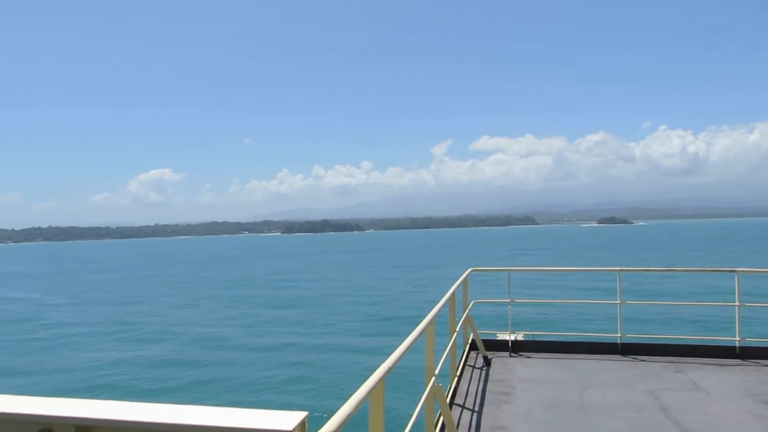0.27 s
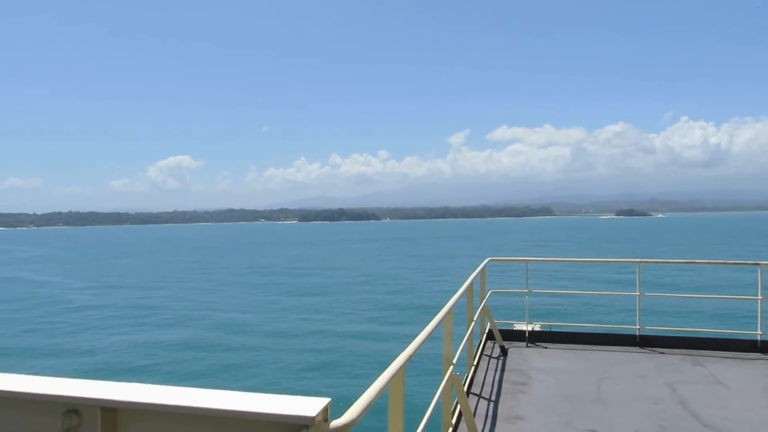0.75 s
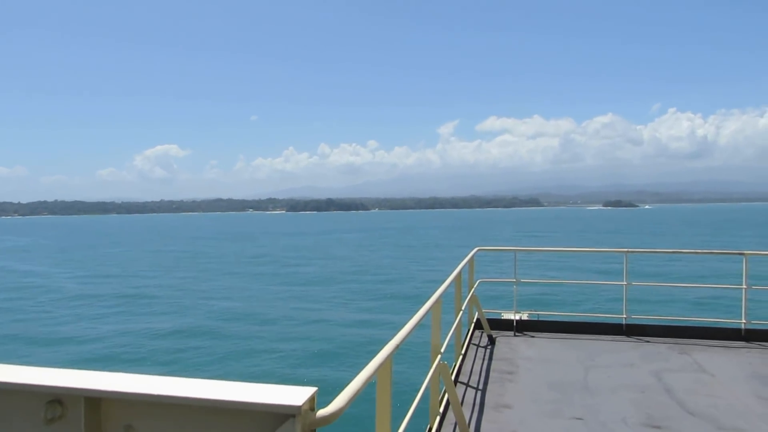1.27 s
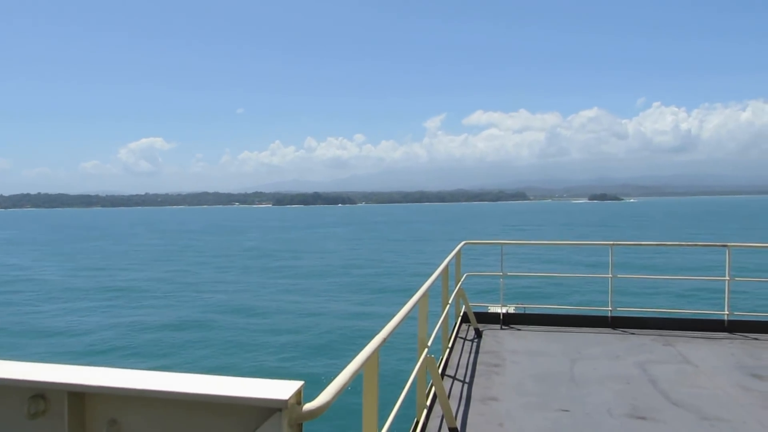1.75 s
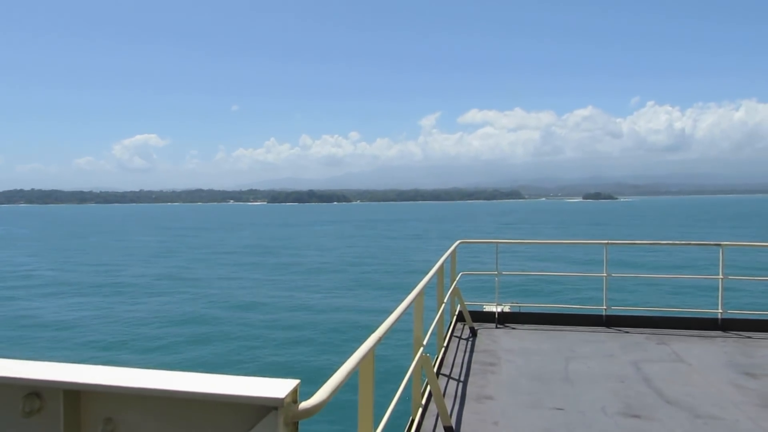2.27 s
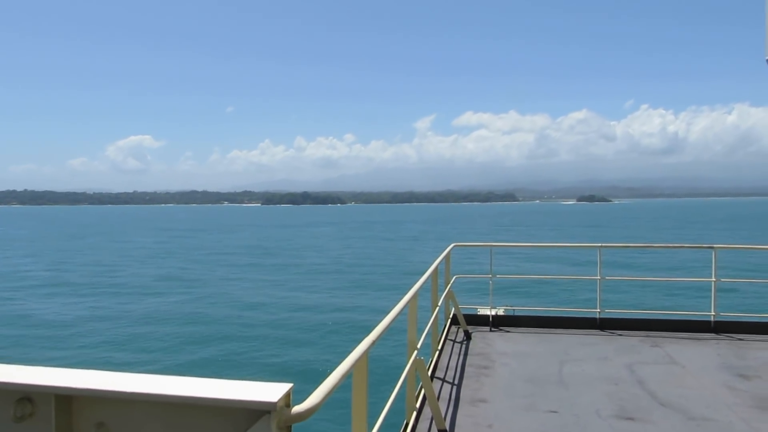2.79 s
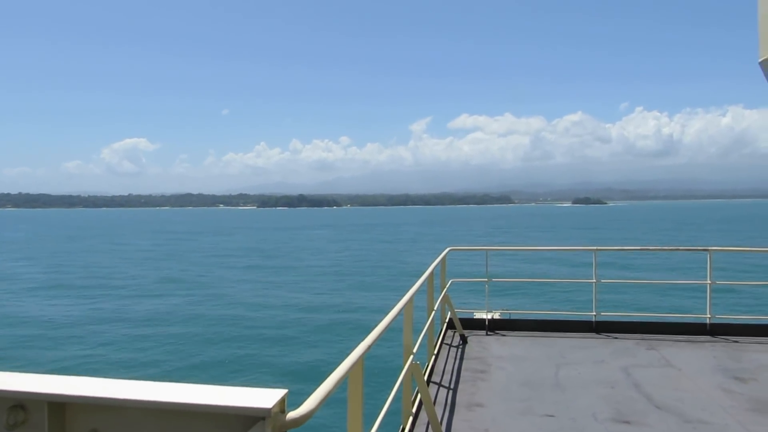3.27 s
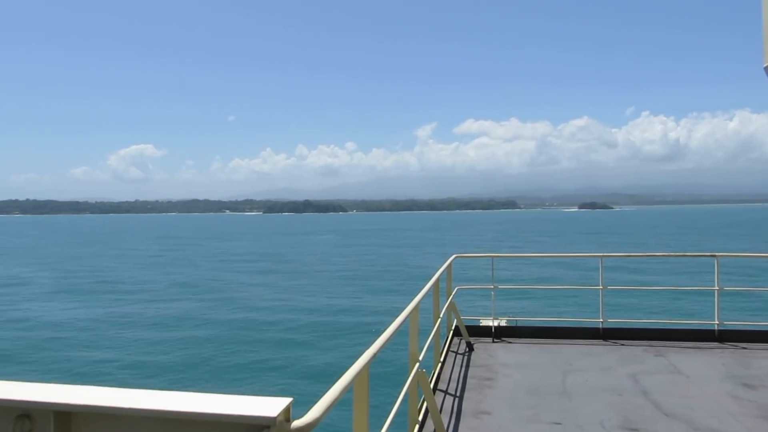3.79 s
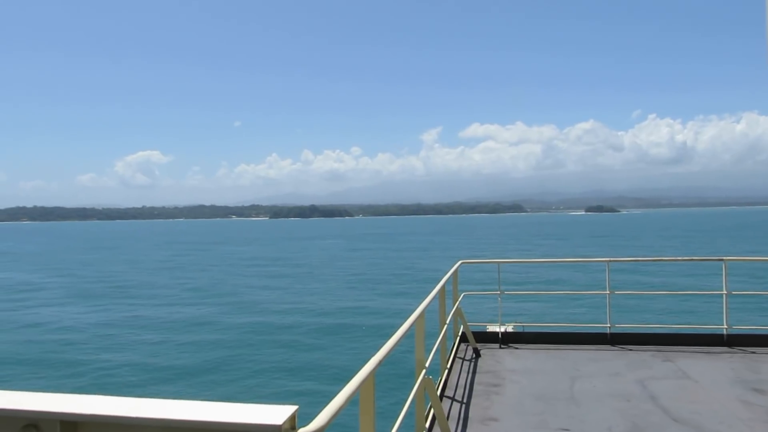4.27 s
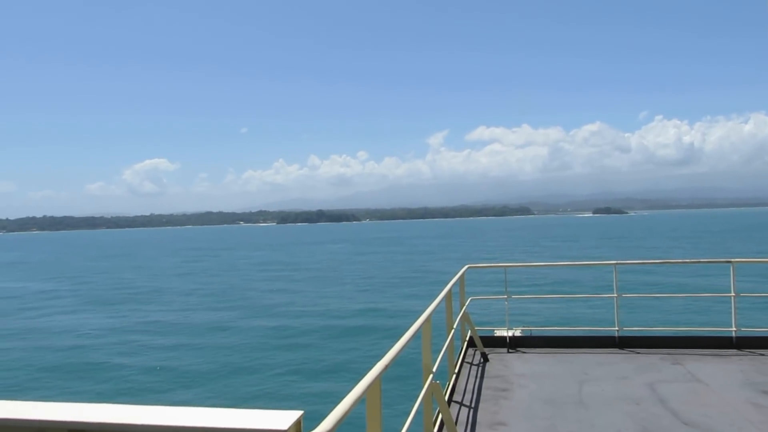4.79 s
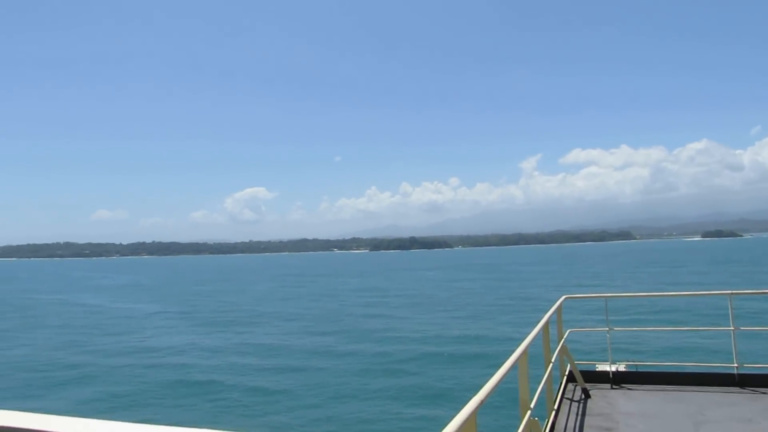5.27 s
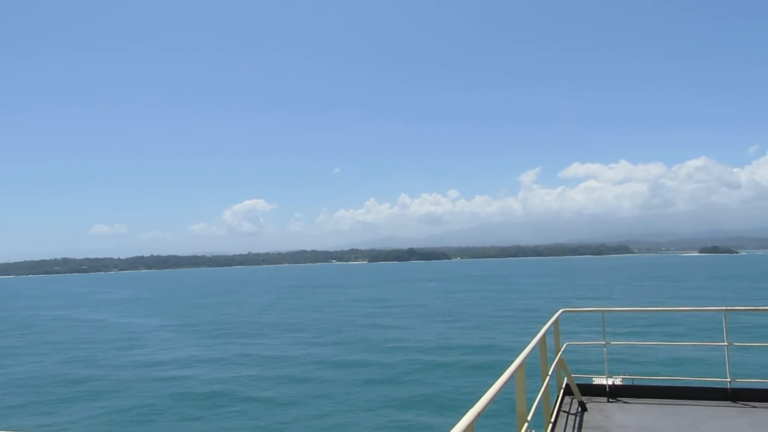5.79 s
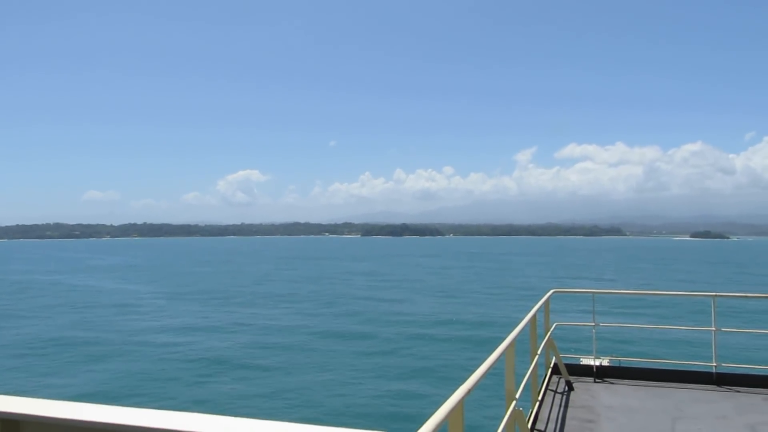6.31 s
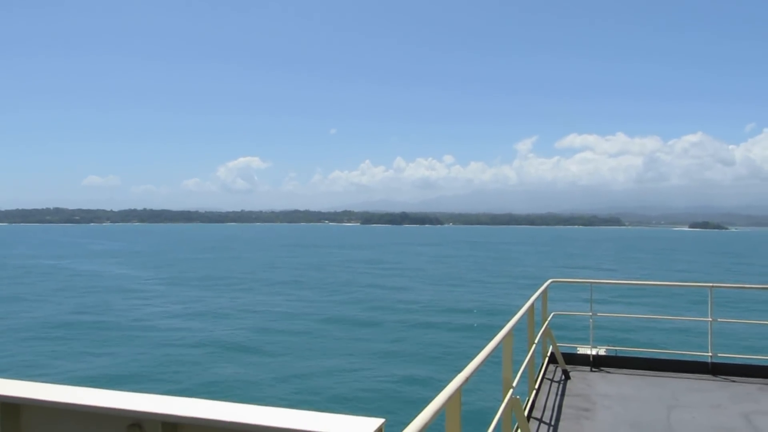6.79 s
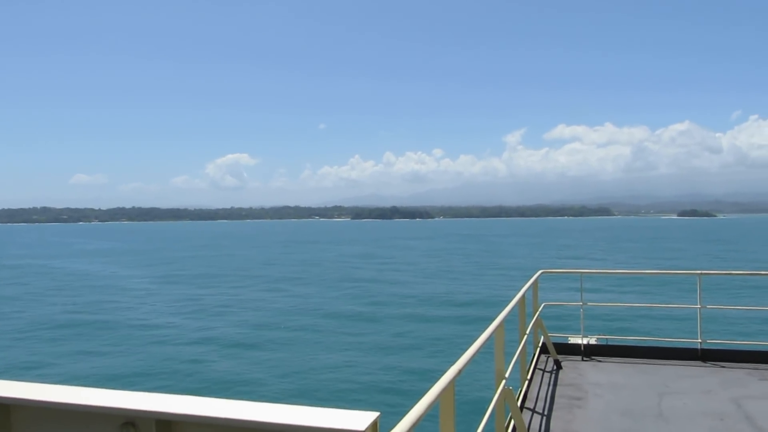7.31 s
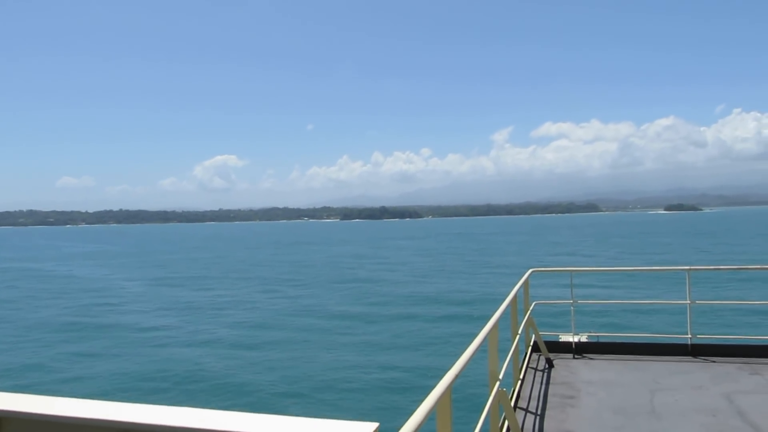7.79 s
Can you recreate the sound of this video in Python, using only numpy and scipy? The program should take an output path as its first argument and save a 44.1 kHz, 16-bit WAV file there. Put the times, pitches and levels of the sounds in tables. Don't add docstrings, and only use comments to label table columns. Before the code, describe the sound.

Deep diesel drone and rolling throb under a broad fan and wash roar, with bursts of low wind buffeting and occasional knocks on the microphone housing.

```python
import sys
import numpy as np
from scipy import signal
from scipy.fft import rfft, irfft, next_fast_len
from scipy.io import wavfile

SR = 44100
rng = np.random.default_rng(int(sys.argv[2]) if len(sys.argv) > 2 else 0)


def invert_db(level):
    return 10 ** (np.asarray(level, dtype=float) / 20)


def wav_out(sig):
    wavfile.write(sys.argv[1], SR, np.round(np.clip(np.atleast_2d(sig).T, -1, 1) * 32767).astype(np.int16))


N = 355005
TIME = np.arange(N) / SR
ENGINE_CYCLE_HZ = 6.006


def rms_one(x):
    return x / np.sqrt(np.mean(x ** 2) + 1e-20)


def in_time(rows):
    return np.interp(TIME, *np.transpose(rows))


def at_hz(points, hz, axis=1):
    points = np.array(points)
    return np.interp(np.log(hz), np.log(points[:, 0]), points[:, axis])


def drift(rate_hz):
    pole = np.exp(-80 * np.pi * rate_hz / SR)
    noise = rng.standard_normal(N // 40 + 2002)
    slow = signal.lfilter([1], [1, -2 * pole, pole * pole], noise)[2000:]
    return np.interp(np.arange(N) / 40, np.arange(len(slow)), rms_one(slow))


def tone(phase, level_db, pan_db, right_lead):
    left = np.cos(phase)
    right = invert_db(-pan_db) * np.cos(phase + right_lead)
    return np.sqrt(2) * invert_db(level_db) * np.array([left, right])


# pitch_hz, density_db (per Hz)
ROAR_SPECTRUM = [(12, -24.5), (30, -7), (70, -3.5), (125, -3.5), (175, -0.5), (225, -5), (270, -11.5),
                 (350, -11.5), (500, -18), (1000, -23.5), (2000, -34.5), (3500, -43), (4400, -50),
                 (7500, -55), (13000, -66), (15500, -86)]
# pitch_hz, width_hz, boost_db
DUCT_RESONANCES = [(172, 20, 2), (484, 45, 4), (720, 50, 4), (1050, 80, 2.5), (1633, 24, 7)]
# pitch_hz, left_right_likeness (-1 to 1), left_minus_right_db
ROAR_IMAGE = [(25, 0.064, 3.5), (70, 1, 6.5), (140, 0.83, 4.5), (307, 1, 8), (600, 0.77, 1),
              (1000, 0.88, 2.2), (2000, 0.67, 1), (3500, 0.52, 1.2), (5000, 0.34, 0.5), (7500, -.06, 0),
              (10000, -.24, 1.5), (14000, 0.037, 0.5)]


def roar(patchy_db, shared_db):
    roar_db = -24
    size = next_fast_len(N)
    hz = np.maximum(np.arange(size // 2 + 1) * SR / size, 1)
    level_db = at_hz(ROAR_SPECTRUM, hz)
    for duct_hz, width_hz, boost_db in DUCT_RESONANCES:
        level_db = level_db + boost_db / (1 + (2 * (hz - duct_hz) / width_hz) ** 2)
    alike = np.clip(at_hz(ROAR_IMAGE, hz), -1, 1)
    pan_db = at_hz(ROAR_IMAGE, hz, axis=2)
    mid, side = rfft(rng.standard_normal((2, size)))
    ports = np.sqrt(1 + alike) * mid + np.sqrt(1 - alike) * side * [[1], [-1]]
    ports = ports * invert_db(level_db + pan_db * [[.5], [-.5]])
    out, together = 0, drift(0.74)
    for centre_hz in 20 * 2. ** np.arange(0, 12, 2):
        band = np.cos(np.clip(np.log2(hz / centre_hz) / 2, -1, 1) * np.pi / 2) ** 2
        flicker_db = shared_db * together + patchy_db * drift(5.8)
        out = out + irfft(ports * band, size)[:, :N] * invert_db(flicker_db)
    return invert_db(roar_db) * rms_one(out)


HUM_HZ = [118.17, 145.67, 236.25, 596.3, 844.25, 894.3, 1192.5]
# left_rms_db, left_minus_right_db, wander_db
HUM_LEVELS = [(-44.5, 8.9, 1.9), (-37, 9.3, 2.2), (-31, 5.5, 0.33), (-47.5, 7.1, 3.8), (-62.5, 13, 3.2),
              (-49, 4.8, 2.5), (-60, 5.6, 2.9)]


def auxiliaries(turns):
    out = 0
    for hz, (level_db, pan_db, wander_db) in zip(HUM_HZ, HUM_LEVELS):
        phase = 2 * np.pi * (hz / ENGINE_CYCLE_HZ * turns + rng.random())
        phase = phase + .002 * hz * drift(2)
        out = out + tone(phase, level_db + wander_db * drift(1.0), pan_db, right_lead=0.085)
    return out


# time_s, left_rms_db
BLOWER_SWELL = [(0.0, -35.5), (.31, -35.5), (1.41, -39), (2.76, -38), (4.3, -41), (4.87, -42.5),
                (5.18, -34.5), (5.6, -39), (6.6, -36.5), (8.05, -35)]
CANCEL_S = [2.94, 3.27, 3.99, 6.36]


def blower(turns):
    blade_hz, fade_db, fade_half_s = 298.12, 11, .15
    fades = sum(np.clip(1 - abs(TIME - s) / fade_half_s, 0, 1) for s in CANCEL_S)
    level_db = in_time(BLOWER_SWELL) - fade_db * fades + 5.0
    level_db = level_db - gain_control()
    return tone(2 * np.pi * blade_hz / ENGINE_CYCLE_HZ * turns, level_db, pan_db=7, right_lead=0.6)


# start_s, peak_db, strongest_hz, fall_db (per octave away), left_minus_right_db
TICKS = [(.0847, -51.5, 13450, 17.5, -2), (.4289, -50.5, 6800, 7.5, 2.5), (.5322, -62, 10000, 6.5, -6),
         (.834, -47.5, 3500, 11.5, 2.5), (1.1538, -46.5, 5000, 12, 1), (2.4182, -36, 3400, 9, -3),
         (2.419, -21.5, 600, 30, -2), (4.579, -57, 12100, 7, 4), (4.585, -46.5, 5000, 5.5, 6),
         (4.5900, -24.5, 1500, 8.5, 1), (4.5908, -37.5, 4200, 7.5, -1.5), (4.597, -35, 1500, 7, 1),
         (4.809, -45, 3990, 7.5, 7.5), (4.8245, -42, 7500, 3, 9), (4.8274, -39.5, 9100, 2, 5),
         (5.124, -43.5, 3500, 8, 3), (5.441, -57, 9000, 4.5, 4), (5.4563, -19.5, 2430, 27.5, -4),
         (5.5278, -60, 12000, 3, 5), (7.1247, -52.5, 12550, 3, 10), (7.2739, -59.5, 10000, 8.5, -1.5),
         (7.455, -59.5, 11000, 3, 1.5)]
# pitch_hz, level_db, t60_s
HOUSING_MODES = [
    [(600, -3, .16)],
    [(1400, 0, .02), (1850, 0, .018)],
    [(2150, -2, .012), (2550, -3, .01), (3100, 0, .01), (3500, 0, .01)],
    [(4600, 0, .008), (5300, -1, .007), (6100, -4, .007), (7000, -2, .007)],
    [(8600, 0, .006), (9400, 1, .007), (10800, -3, .004), (12400, -2, .005), (14000, -6, .003)],
]
# rise_end_s, fall_start_s (earlier, so the fall cuts the rise short), edge_s,
# rms_db (before the cut)
FINGER_RUB = (4.69, 4.5, 0.3, -73)


def ticks():
    slip_n = 90
    rocking_below_hz = 1000
    start_s, peak_db, strongest_hz, fall_db, pan_db = np.array(TICKS).T
    out = np.zeros((2, N))
    at = np.round(start_s * SR).astype(int)[:, None] + np.arange(slip_n)
    for modes in HOUSING_MODES:
        band = 0
        for hz, mode_db, t60 in modes:
            drive_db = peak_db - fall_db * abs(np.log2(hz / strongest_hz)) + mode_db - 4
            drive_db = drive_db + pan_db * [[.5], [-.5]]
            left, other = rng.standard_normal((2, *at.shape)) * np.hanning(slip_n)
            right = np.sign(hz - rocking_below_hz) * .7 * left + .7 * other
            slip = np.array([left, right])
            turn = np.exp(2j * np.pi * hz / SR * np.arange(slip_n))
            slip = slip / abs(slip @ turn)[..., None].mean(axis=0)
            force = np.full((2, N), 1e-18)
            np.add.at(force, (slice(None), at), slip * invert_db(drive_db)[..., None])
            r, w = invert_db(-60 / (t60 * SR)), 2 * np.pi * hz / SR
            band = band + signal.lfilter([0, np.sin(w)], [1, -2 * r * np.cos(w), r * r], force)
        out += signal.sosfilt(signal.butter(4, 1.15 * hz, fs=SR, output="sos"), band)
    return (out + finger_rub()) / invert_db(gain_control())


def finger_rub():
    start, end, edge, rub_db = FINGER_RUB
    hiss_band = signal.butter(2, [8200, 12500], "band", fs=SR, output="sos")
    hiss = signal.sosfilt(hiss_band, rng.standard_normal(N))
    swell = np.clip(np.minimum(TIME - start, end - TIME) / edge + 1, 0, 1)
    return invert_db(rub_db) * swell * rms_one(hiss)


def eddies(low_hz, high_hz, per_s, spread_db):
    happens = rng.random(N) < per_s / SR
    kicks = happens * invert_db(spread_db * rng.standard_normal(N)) * rng.choice([-1, 1], N)
    band = np.vstack([signal.butter(2, low_hz, "high", fs=SR, output="sos"),
                      signal.butter(3, high_hz, fs=SR, output="sos")])
    return rms_one(signal.sosfilt(band, kicks + 1e-18))


# start_s, rms_db, length_s
GUSTS = [(1.177, -9.5, .018), (1.641, -17.5, .023), (1.759, -18, 0.023), (1.826, -20, .04),
         (2.055, -17.5, 0.025), (2.685, -20, .023), (2.788, -19.5, .02), (3.452, -21, .015),
         (3.5, -19, .028), (3.622, -6.5, 0.014), (3.751, -5.5, 0.11), (3.881, -11, .014),
         (3.961, -9.5, 0.019), (4.005, -7, 0.0069), (4.146, -8, 0.12), (4.193, -11.5, .029),
         (4.246, -18, .016), (4.286, -8.5, 0.016), (4.308, -12.5, 0.019), (4.454, -11, .024),
         (4.497, -15, 0.028), (5, -21, .02), (5.128, -23, .089), (5.545, -16, .067), (5.7, -18, .024),
         (5.733, -17, .022), (5.919, -17, 0.026), (5.97, -20, 0.023), (6.06, -17, .04), (6.113, -20, .029)]
# time_s, rms_db
BREEZE = [(0, -36), (1.3, -40.5), (1.6, -33), (3.3, -32.5), (3.6, -24.5), (4.5, -23), (4.7, -46),
          (5.1, -32), (5.6, -23.5), (6.1, -37.5), (6.5, -43), (8.05, -44)]


def wind():
    bright_base_db, per_breeze, per_puff = -13.5, .85, 0.33
    light_breeze_db, usual_puff_db = -33, -17
    dull = eddies(low_hz=38, high_hz=115, per_s=82, spread_db=4.0)
    bright = eddies(low_hz=100, high_hz=238, per_s=600, spread_db=6.0)
    out = invert_db(in_time(BREEZE) + 3 * drift(9)) * dull[::-1]
    for s, level_db, length in GUSTS:
        part = slice(round((s - .05) * SR), round((s + .3) * SR))
        after = TIME[part] - s
        shape = np.exp(-(after / np.where(after < 0, .014, 0.9 * length)) ** 4)
        breeze_db = np.interp(s, *np.transpose(BREEZE))
        bright_db = bright_base_db + per_breeze * (breeze_db - light_breeze_db)
        bright_db = bright_db + per_puff * (level_db - usual_puff_db)
        share = np.clip(invert_db(bright_db), 0, .95)
        mix = np.sqrt(1 - share ** 2) * dull[part] + share * bright[part]
        mix = mix / np.sqrt(np.sum((mix * shape) ** 2) / np.sum(shape ** 2))
        out[part] += invert_db(level_db - 1.5) * shape * mix
    out = signal.sosfilt(signal.butter(3, 480, fs=SR, output="sos"), out)
    return out / invert_db(gain_control()) * [[.97], [-1.03]]


# time_s, cycles_completed
ENGINE_TURNS = [(0, 0.0163), (2, 12.0119), (3.5, 21.007), (5, 30.0057), (6, 36.0061), (8.05, 48.3193)]
# order (multiple of the cycle rate), left_rms_db, left_minus_right_db
ENGINE_ORDERS = [(3, -39, 6), (4, -32, 5), (5, -37, 10), (6, -37, 8), (7, -25, 6), (8, -24, 6), (9, -30, 8),
                 (10, -37, 7), (12, -37, 13), (13, -33, 9), (15, -19, 6), (16, -39, 3), (17, -23, 6),
                 (18, -30, 7), (19, -38, 11), (20, -38, 9), (21, -46, 3), (22, -40, 8), (23, -35, 6),
                 (24, -40, 7), (29, -34, 7), (30, -42, 6), (32, -38, 6), (37, -44, 3), (40, -44, 7),
                 (42, -48, 5), (43, -46, 5), (44, -44, 5), (45, -51, 4)]
SOUND_PATHS = [
    (6, .99, .42, 1.0),
    (11, 2.33, .5, -.74),
    (60, -1.04, -1.22, -.86),
]


def engine(turns):
    out, load_db = 0, .3 * drift(1.5)
    for order, level_db, pan_db in ENGINE_ORDERS:
        _, lag, delay, smear = next(path for path in SOUND_PATHS if order <= path[0])
        phase = order * (2 * np.pi * turns + delay) + lag + smear * order ** 2
        out = out + tone(phase, level_db + load_db, pan_db, right_lead=0.0026 * order * ENGINE_CYCLE_HZ)
    return out


def scene():
    turns = in_time(ENGINE_TURNS)
    machinery = engine(turns) + auxiliaries(turns) + blower(turns)
    return machinery + roar(patchy_db=.5, shared_db=.3) + wind() + ticks()


def gain_control():
    threshold_db, duck_per_db, most_db = -12, 0.6, 4.5
    attack_s, recover_db_per_s = 0.016, 4.5
    t = TIME[::64]
    duck = np.zeros(len(t))
    for s, level_db, length in GUSTS:
        over_db = level_db + np.interp(s, t, duck) - threshold_db
        depth = np.clip(duck_per_db * over_db, 0, most_db)
        fall = np.clip((t - s) / (attack_s + length), 0, 1)
        recovered = recover_db_per_s * np.maximum(t - s - length, 0)
        duck = np.maximum(duck, depth * fall - recovered)
    return -np.interp(TIME, t, duck)


# pitch_hz, width_hz, depth (0 to 1)
SUB_BAND_GAPS = [(3943, 180, 0.7), (7960, 130, 1)]


def sub_band_gaps(x):
    size = next_fast_len(N)
    hz = np.arange(size // 2 + 1) * SR / size
    gain = 1
    for gap_hz, width_hz, depth in SUB_BAND_GAPS:
        gain = gain - np.clip(depth, 0, 1) * np.exp(-((hz - gap_hz) / width_hz) ** 2)
    return irfft(rfft(x, size) * gain, size)[:, :N]


def low_pass(x):
    return signal.sosfilt(signal.butter(12, 15250, fs=SR, output="sos"), x)


def record(dry):
    x = dry * invert_db(gain_control())
    x = x / (1 + x ** 6) ** (1 / 6)
    return low_pass(sub_band_gaps(x))


dry = scene()
out = record(dry)
wav_out(out)
```